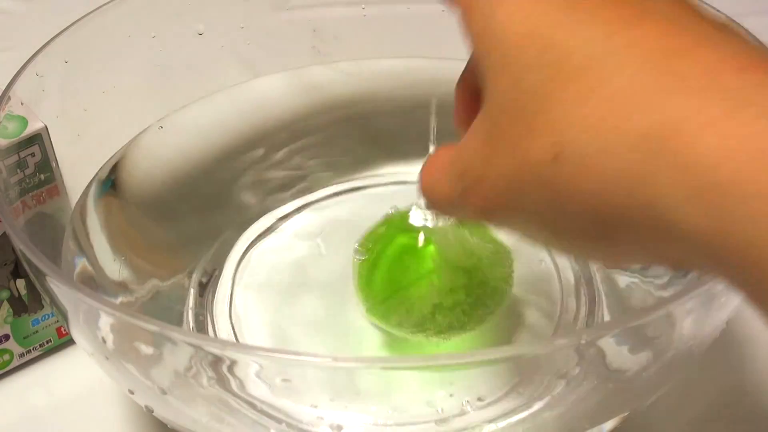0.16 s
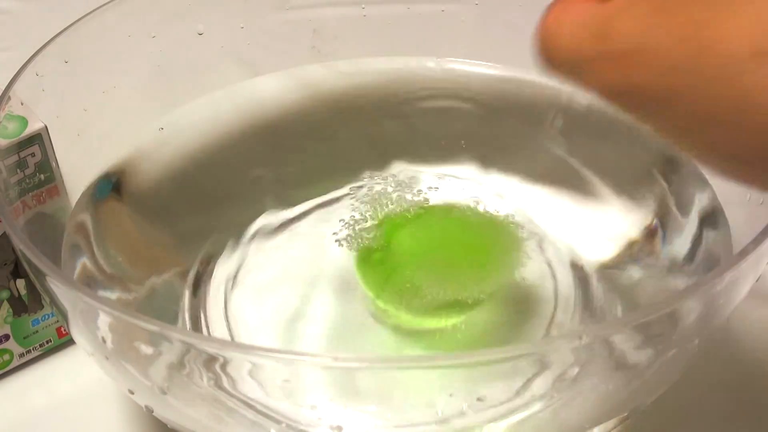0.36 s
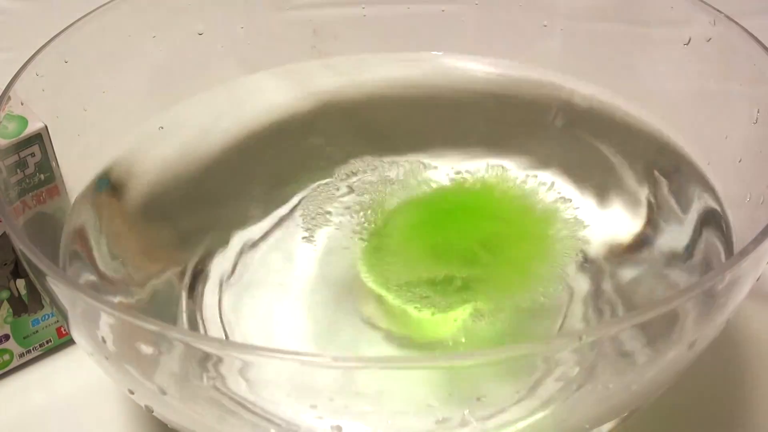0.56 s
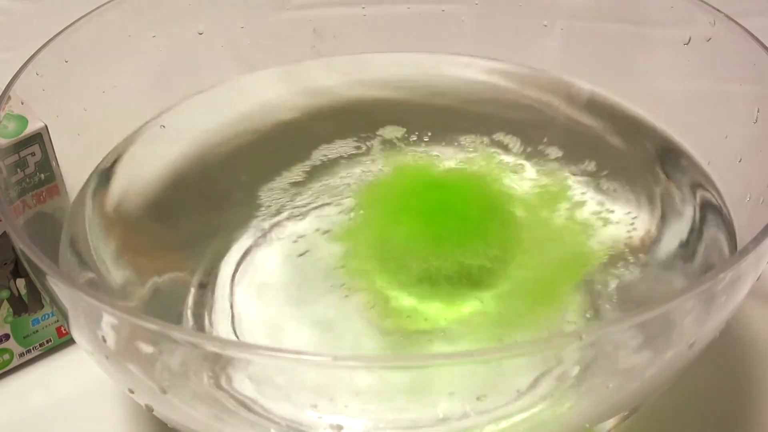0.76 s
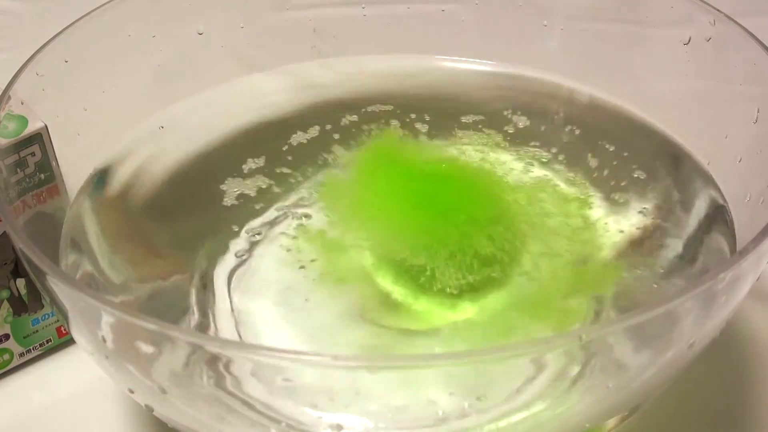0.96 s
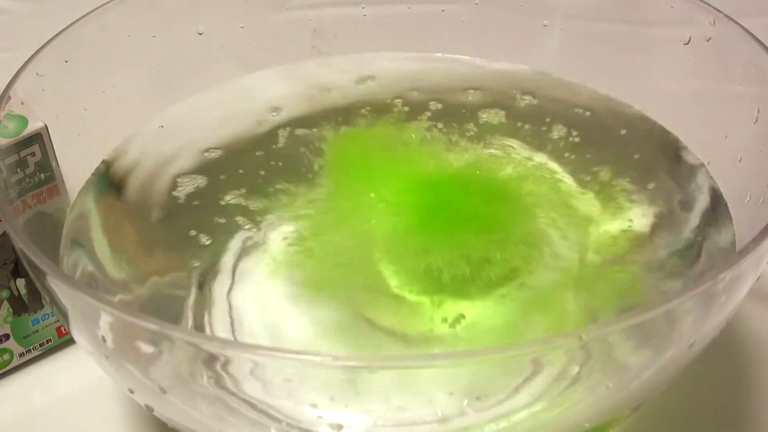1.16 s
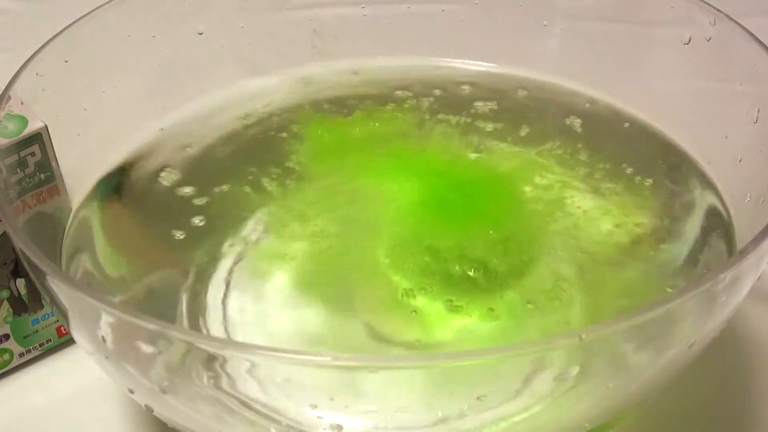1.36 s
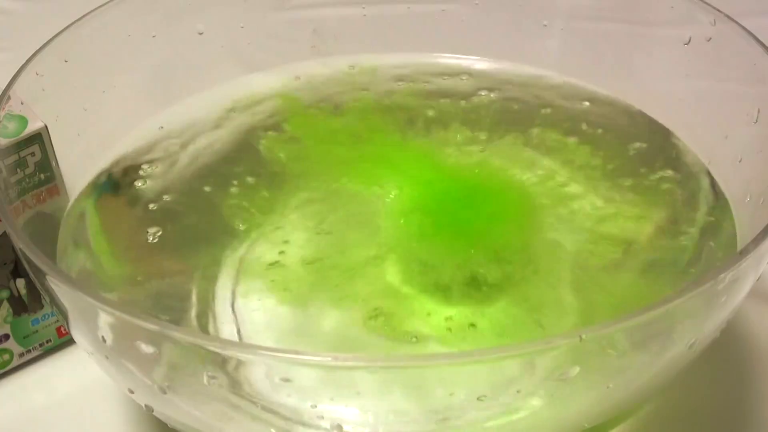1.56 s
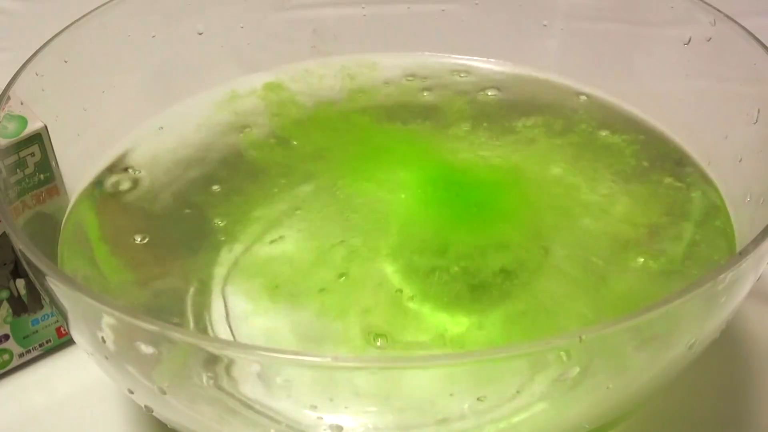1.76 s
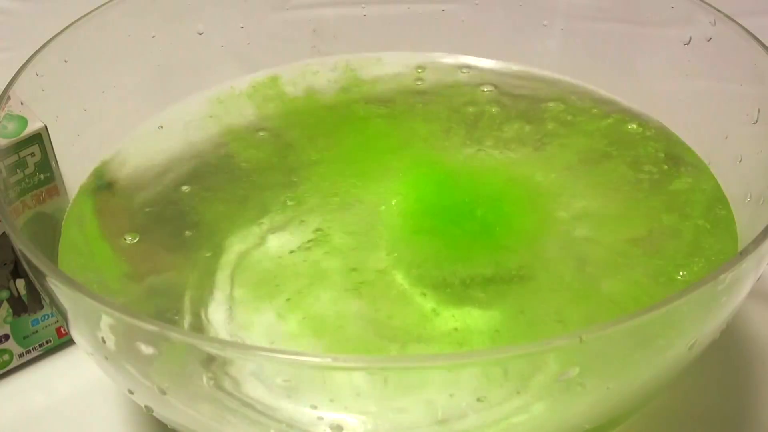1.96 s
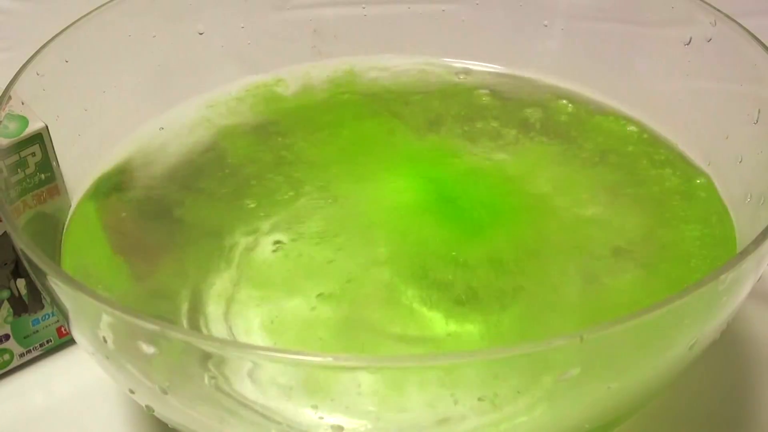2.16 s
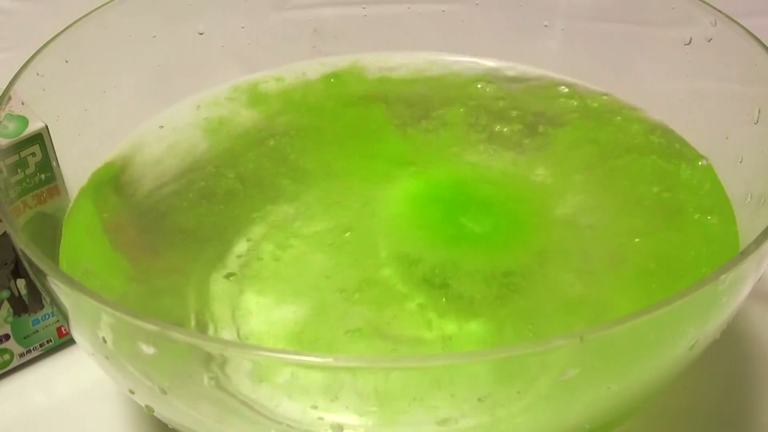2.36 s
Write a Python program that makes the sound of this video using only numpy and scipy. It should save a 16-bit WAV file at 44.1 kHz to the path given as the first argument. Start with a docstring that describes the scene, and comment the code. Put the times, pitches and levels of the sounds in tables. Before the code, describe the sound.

A bath bomb plops into a bowl of water, then fizzes more and more.

```python
"""A bath bomb fizzes in a plastic bowl of water: countless tiny bubbles burst at the surface,
building steadily, with a few larger pings and a low gurgle. At the start it hisses as it gets wet,
sinks with the plop of a collapsing air pocket, knocks the bowl and settles.
A small room rings briefly after the plop and rumbles softly throughout."""
import sys
import numpy as np
from scipy import signal
from scipy.fft import rfft, irfft
from scipy.io import wavfile

SR = 44100
rng = np.random.default_rng(int(sys.argv[2]) if len(sys.argv) > 2 else 0)


def dump_mix(stems):
    """Bounce the given channels to the path in sys.argv[1] as a 16-bit WAV at rate SR."""
    frames = np.atleast_2d(stems).T  # one column per channel
    limited = np.clip(frames, -1, 1)  # hard clip at full scale
    pcm = np.round(limited * 32767).astype(np.int16)
    wavfile.write(sys.argv[1], SR, pcm)


N = 105840

# room noise spectrum (frequency [Hz], gain [dB])
RUMBLE_SPECTRUM = [(20, -12), (60, -3), (130, -2.5), (240, -4), (400, -6), (560, -4), (850, -10),
                   (1100, -7), (1500, -12.5), (2200, -10), (3000, -18.5), (6000, -29), (10000, -42),
                   (16000, -49)]
# room drones (frequency [Hz], half-width [Hz], level [dB])
ROOM_DRONES = [(98.3, 9.6, -55), (177, 14.5, -50), (209.3, 24, -56)]
# room noise envelope (time [s], gain [dB])
RUMBLE_ENVELOPE = [(0, 0), (.4, -2), (.7, -.5), (1.0, -.5), (1.6, 0), (1.93, 3.5), (2.14, 0), (2.28, 2.5),
                   (2.4, 1.5)]
# low room resonances (frequency [Hz], level [dB], T60 [s])
ROOM_RESONANCES = [(225.7, -18, 0.18), (287.5, -16.5, 0.2), (333, -27, 0.29), (353, -45.5, 0.55),
                   (463, -33, .2), (493, -43, .2), (641, -47, 0.13), (666, -35.5, 0.26), (740, -46, 0.15)]
# diffuse echo spectrum (frequency [Hz], gain [dB])
ECHO_SPECTRUM = [(50, -23), (120, -7), (200, 8.5), (380, 0.5), (680, 7.5), (850, 4), (1250, -6.5),
                 (1700, -9), (2550, -8), (3000, -16.5), (3900, -13), (5000, -24.5), (9000, -37),
                 (14000, -32)]
# stirred water spectrum (frequency [Hz], gain [dB])
STIR_SPECTRUM = [(60, -2), (120, 9.5), (300, 2.5), (1000, -1.5), (1800, -5.5), (3000, -24), (8000, -55)]
# gurgle envelope (time [s], level [dB])
GURGLE_ENVELOPE = [(0, -62), (.6, -55), (.85, -55), (1.28, -55), (1.44, -45.5), (1.62, -51.5), (1.75, -55),
                   (2.05, -50), (2.4, -58)]
# bowl modes (frequency [Hz], level [dB], T60 [s], rise [s])
BOWL_MODES = [(183.5, -17.5, 0.15, 0.0054), (472, -14.5, 0.058, 0.0019), (574, -16, 0.046, 0.006),
              (694, -8.5, 0.064, 0.0064), (1161, -23.5, 0.048, 0.0059), (1228, -17.5, 0.04, 0.0058),
              (1297, -44, 0.21, 0.0064), (2511, -16.5, 0.036, 0.0016), (2570, -45, 0.015, 0.0011),
              (3550, -24, 0.017, 0.0002), (6240, -21.5, 0.008, 0.0008)]
# impact tick spectrum (frequency [Hz], gain [dB])
TICK_SPECTRUM = [(100, -20), (400, 9), (1200, 0.5), (2500, 8), (3600, -12), (4500, -6.5), (6500, 2),
                 (9000, -10), (12500, -0.5), (16000, -2)]
# settling clack spectrum (frequency [Hz], gain [dB])
CLACK_SPECTRUM = [(500, -19), (1200, -13), (1750, -2), (2100, -7), (2600, 11), (3100, -26), (3700, -3),
                  (4850, -2), (5300, -22), (6200, -18), (9000, -27), (12000, -16), (16000, -26)]
# single larger bubbles (time [s], pitch [Hz], level [dB])
PING_EVENTS = [(.818, 4950, -42.5), (.842, 3840, -43.5), (.876, 3400, -42.5), (.968, 3720, -44),
               (1.201, 7540, -36), (1.354, 5260, -33), (1.446, 5555, -35), (1.522, 3620, -43),
               (1.555, 5100, -37), (1.854, 5830, -34.5), (2.113, 4400, -36), (2.120, 6440, -28),
               (2.200, 6980, -29.5), (2.309, 1780, -55), (2.318, 5125, -41)]
# wetting hiss spectrum (frequency [Hz], gain [dB])
WETTING_SPECTRUM = [(1500, -7), (3000, -18), (4300, 1), (5300, -8.5), (6400, 4), (7000, -6), (7700, -1),
                    (9000, -10), (12000, -1.5), (14500, 6), (16000, 1.5)]
# crackles of the first gas (time [s], level [dB])
CRACKLE_EVENTS = [(.443, -36.5), (.537, -34)]
# fizz envelope (time [s], relative level [dB])
FIZZ_ENVELOPE = [(0, -61), (.17, -61), (.35, -65), (.48, -57.5), (.6, -50), (.75, -46.5), (1.05, -44.3),
                 (1.3, -42), (1.65, -41), (2.0, -38.5), (2.4, -36.3)]
# bursting bubble spectrum (frequency [Hz], gain [dB])
FIZZ_SPECTRUM = [(300, -30), (1100, -9), (1600, -17), (2400, -10.5), (3300, -6), (5000, -5), (7200, -1),
                 (9000, -6), (11000, -2), (13500, 5), (15600, 4), (17000, -4)]
# fizz width, side over mid (frequency [Hz], gain [dB])
FIZZ_WIDTH = [(1000, -10), (2400, -22), (4400, -14), (8200, -5), (10500, -9), (12000, -21), (16000, -26)]
# water, bowl and room balance, left over right (frequency [Hz], gain [dB])
LEFT_BALANCE = [(40, 2), (120, 3), (300, 2), (600, 1.5), (1200, 1.5), (2400, -.6), (4500, -2), (8000, .6),
                (13000, 0)]


def undb(db):
    """Decibels to gain."""
    return 10 ** (np.asarray(db) / 20)


def unit(x):
    """Scale to rms 1."""
    return x / np.sqrt(np.mean(x ** 2) + 1e-20)


def since(start_s):
    """Seconds since start_s, zero before."""
    return np.maximum(np.arange(N) / SR - start_s, 0)


def curve(envelope):
    """Gain along (time [s], level [dB])."""
    return undb(np.interp(since(0), *np.array(envelope).T))


def fade(t, t60):
    """Exponential decay, -60 dB at t60."""
    return np.exp(-np.log(1000) * t / t60)


def ramp(t, length):
    """Smooth rise from 0 to 1."""
    return np.sin(np.pi / 2 * np.clip(t / length, 0, 1)) ** 2


def colour(x, spectrum):
    """Filter by (frequency [Hz], gain [dB])."""
    hz, db = np.array(spectrum).T
    bins_hz = np.maximum(np.fft.rfftfreq(N, 1 / SR), 1)
    return irfft(rfft(x) * undb(np.interp(np.log(bins_hz), np.log(hz), db)), N)


def noise(spectrum):
    """Coloured noise, rms 1."""
    return unit(colour(rng.standard_normal(N), spectrum))


def stereo(mid, side):
    """Mid/side to left/right."""
    return np.array([mid + side, mid - side])


def ring(t, hz, t60_s, rise_s):
    """One mode: builds up, dies away."""
    return np.sin(2 * np.pi * hz * t) * ramp(t, rise_s) * fade(t, t60_s)


def bubbles(per_s, centre_hz, spread_oct, cycles, spread_db, glide):
    """Random bubbles, each a short ring rising in pitch; returns mid (rms 1) and side."""
    out = np.zeros((2, N))
    draws = np.random.default_rng(rng.integers(2 ** 31)).random((int(per_s * N / SR), 5))
    for when, pitch_a, pitch_b, size, pan in draws:
        hz = min(centre_hz * 2 ** (spread_oct * (pitch_a + pitch_b - 1)), SR / 3)
        start = int(when * N)
        t = np.arange(min(int(cycles / hz * SR), N - start)) / SR
        age = t * hz / cycles
        gain = undb(-spread_db * np.log(max(size, .02)))
        tone = np.sin(2 * np.pi * hz * t * (1 + glide * age / 2))
        bubble = gain * tone * fade(age, 1) * ramp(t * hz, 1)
        out[:, start:start + len(t)] += bubble, bubble * (2 * pan - 1)
    return out / np.sqrt(np.mean(out[0] ** 2))


def rumble(noise_db=-46.5):
    """Low room noise with narrow, wavering drones."""
    bins_hz = np.fft.rfftfreq(N, 1 / SR)
    drones = np.zeros(N)
    for hz, width_hz, db in ROOM_DRONES:
        resonance = 1 / (1 + ((bins_hz - hz) / width_hz) ** 2)
        drones += undb(db) * unit(irfft(rfft(rng.standard_normal(N)) * resonance, N))
    return undb(noise_db) * noise(RUMBLE_SPECTRUM) + drones


def room_ring(plop_s, delay_s=.021, echo_db=-23, echo_t60_s=.18):
    """The room answers the plop: diffuse echo, then low resonances."""
    t, late = since(plop_s), since(plop_s + delay_s)
    modes = sum(undb(db) * ring(late, hz, t60_s, rise_s=.0072) for hz, db, t60_s in ROOM_RESONANCES)
    return modes + undb(echo_db) * ramp(t, .001) * fade(t, echo_t60_s) * noise(ECHO_SPECTRUM)


def water(stir_db=-43.5, let_go_s=.313, calm_s=.34):
    """Large bubbles gurgle around the bomb; the hand stirs the water until it lets go."""
    mid, side = curve(GURGLE_ENVELOPE) * bubbles(
        per_s=420, centre_hz=680, spread_oct=.24, cycles=36, spread_db=2, glide=.06)
    stir = undb(stir_db) * (1 - ramp(since(let_go_s), calm_s)) * noise(STIR_SPECTRUM)
    return stereo(mid + stir, .28 * side)


def knocks(strike_s=.2358, tick_db=-21, settle_s=.3195, clack_db=-31):
    """The bomb strikes the water-damped bowl with a gritty tick, then settles with a soft clack."""
    t, later = since(strike_s), since(settle_s)
    tick = undb(tick_db) * noise(TICK_SPECTRUM) * ramp(t, .00085) * fade(t, t60=.018)
    clack = undb(clack_db) * noise(CLACK_SPECTRUM) * ramp(later, .007) * fade(later, t60=.032)
    bowl = sum(undb(db) * ring(t, hz, t60_s, rise_s) for hz, db, t60_s, rise_s in BOWL_MODES)
    return tick + clack + bowl


def plop(start_s, hz=316, sag_hz_per_s=730, level_db=-2.5):
    """The air pocket behind the bomb throbs for a few cycles, sags in pitch and closes."""
    attack_s, hold_s, release_s = .0056, .0086, .0089
    t = since(start_s)
    closing = 1 - ramp(t - attack_s - hold_s, release_s)
    envelope = ramp(t, attack_s) * fade(t, t60=.25) * closing
    return undb(level_db) * envelope * np.sin(2 * np.pi * (hz * t - sag_hz_per_s * t ** 2 / 2))


def pings():
    """Single larger bubbles ring out above the fizz."""
    return sum(undb(db) * ring(since(start_s), hz, t60_s=.02, rise_s=.00071)
               for start_s, hz, db in PING_EVENTS)


def crackles(rise_s=.00021, t60_s=.0025):
    """Sharp bursts as the first gas surfaces."""
    envelope = sum(undb(db) * ramp(since(start_s), rise_s) * fade(since(start_s), t60_s)
                   for start_s, db in CRACKLE_EVENTS)
    return noise(FIZZ_SPECTRUM) * envelope


def bursts(spectrum, flow, full_flow_per_s=28000, spread_db=3.5):
    """Clicks of bursting bubbles, a few much larger; density follows flow (0-1), rms 1."""
    size = undb(spread_db * np.minimum(rng.exponential(size=N), 5))
    fires = rng.random(N) < flow * full_flow_per_s / SR
    clicks = fires * size * rng.choice([-1, 1], N)
    return unit(colour(clicks / np.sqrt(flow), spectrum))


def wetting(peak_s=.1, rise_s=.058, fall_s=.026, level_db=-43.5):
    """Brief hiss as the bomb gets wet."""
    t = since(0) - peak_s
    envelope = np.exp(-(t / np.where(t < 0, rise_s, fall_s)) ** 2)
    return undb(level_db) * envelope * bursts(WETTING_SPECTRUM, flow=1)


def fizz(trim_db=1, ringing_db=-17.5):
    """After the wetting hiss, gas surfaces ever faster: dense bursts, faint ringing bubbles."""
    gas = undb(trim_db) * curve(FIZZ_ENVELOPE)
    flow = np.sqrt(gas / gas.max())
    mid, side = (gas * bursts(FIZZ_SPECTRUM, flow) + wetting() for _ in range(2))
    mid += crackles()
    ringing_mid, ringing_side = gas * undb(ringing_db) * bubbles(
        per_s=300, centre_hz=6210, spread_oct=.663, cycles=120, spread_db=3.2, glide=.12)
    return stereo(mid + ringing_mid, colour(side, FIZZ_WIDTH) + .5 * ringing_side)


def scene(plop_s=.2378, room_side_db=-28.5):
    """Plop, knocks, water and room lean slightly left; fizz and pings are central."""
    room = curve(RUMBLE_ENVELOPE) * stereo(rumble(), undb(room_side_db) * rumble())
    left, right = plop(plop_s) + knocks() + room_ring(plop_s) + water() + room
    left = colour(left, [(hz, db / 2) for hz, db in LEFT_BALANCE])
    right = colour(right, [(hz, -db / 2) for hz, db in LEFT_BALANCE])
    return np.array([left, right]) + fizz() + pings()


def record(dry, cutoff_hz=15800):
    """Steep low-pass."""
    return signal.sosfilt(signal.ellip(12, .2, 80, cutoff_hz, fs=SR, output="sos"), dry)


dry = scene()
out = record(dry)
dump_mix(out)
```